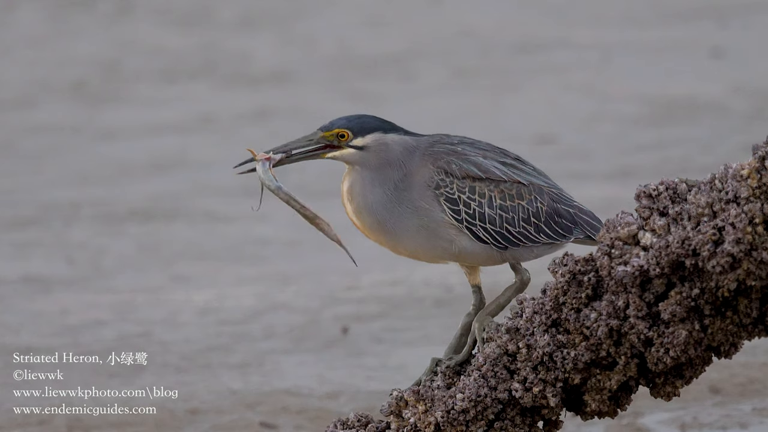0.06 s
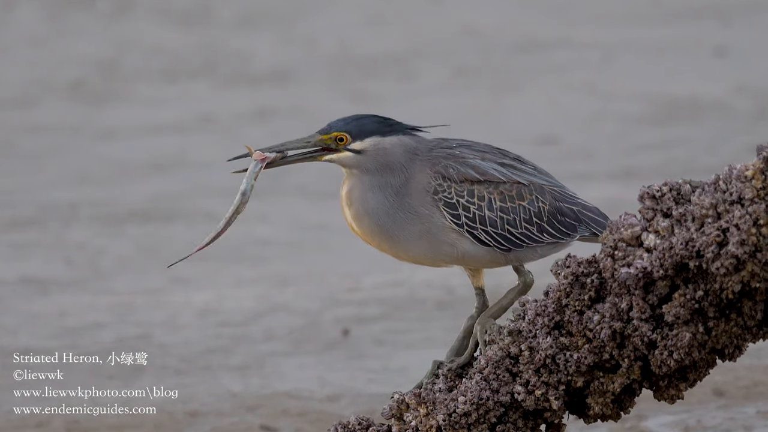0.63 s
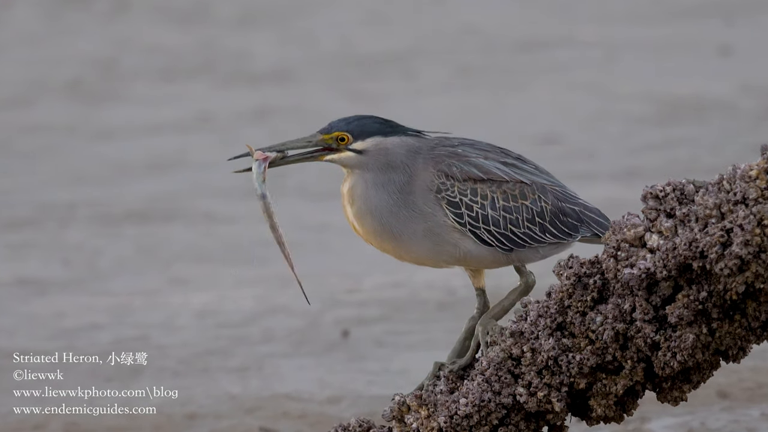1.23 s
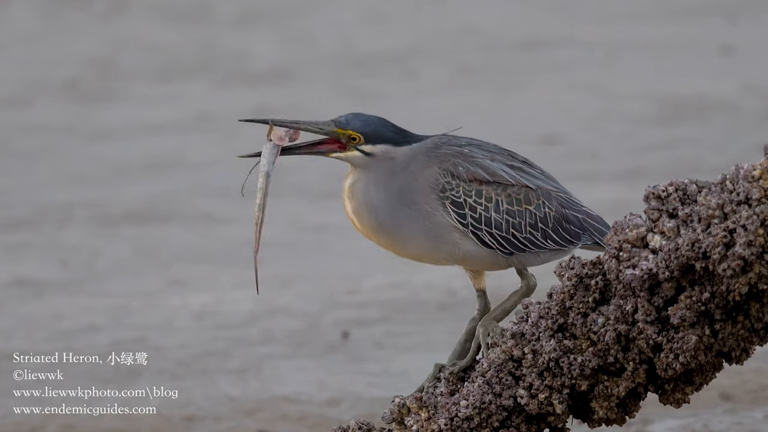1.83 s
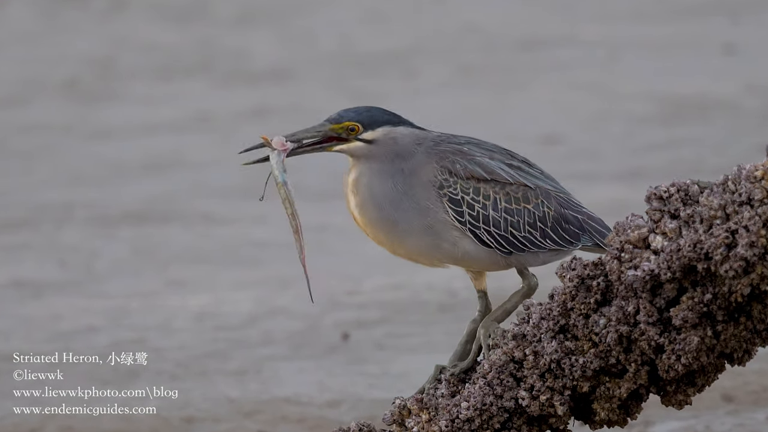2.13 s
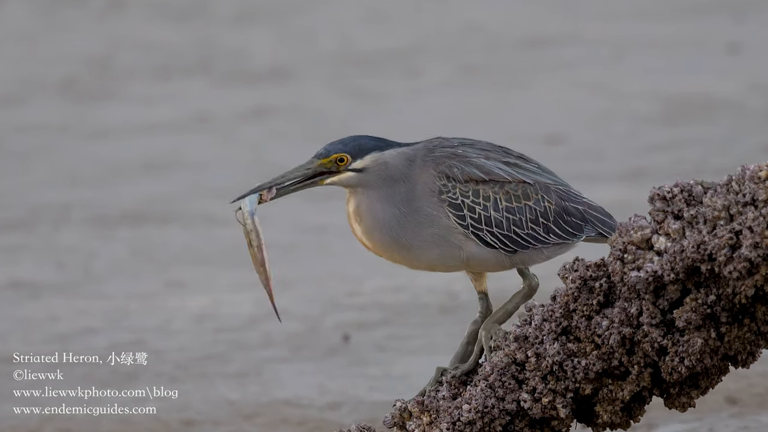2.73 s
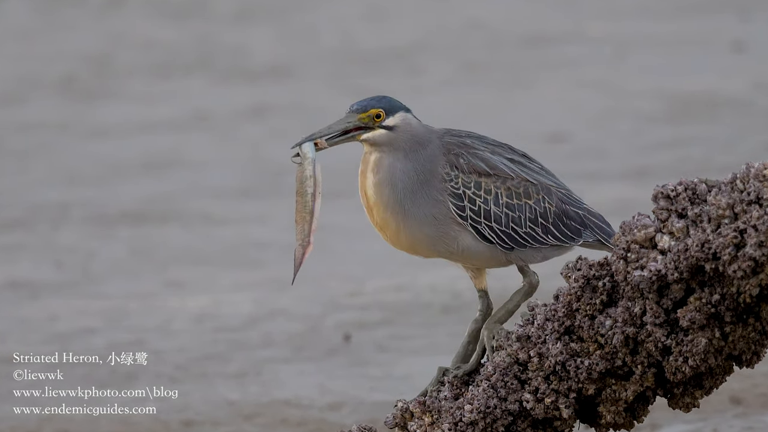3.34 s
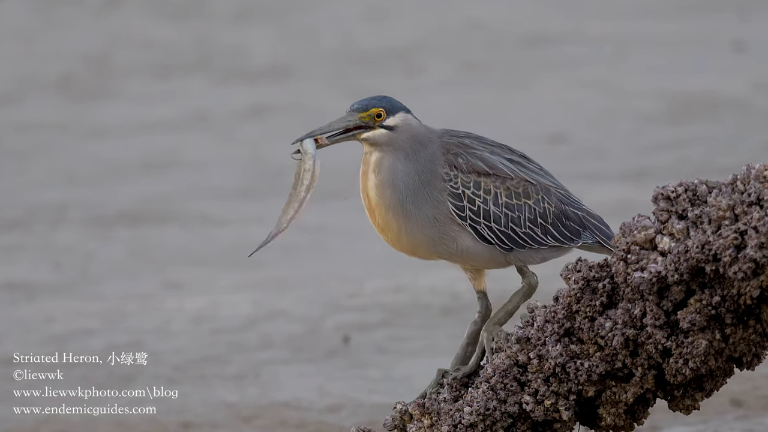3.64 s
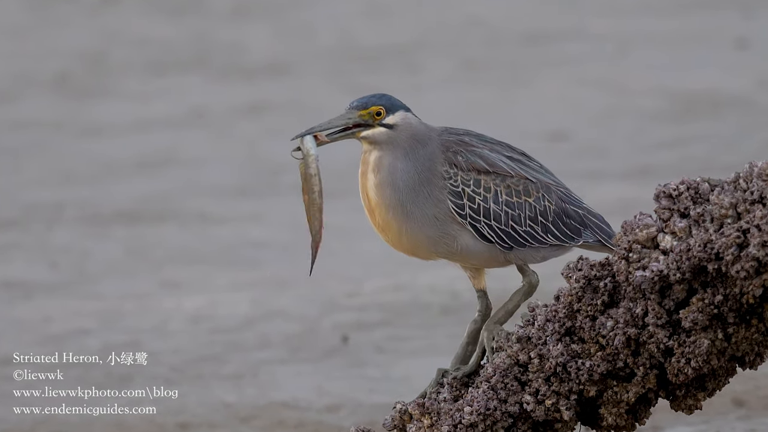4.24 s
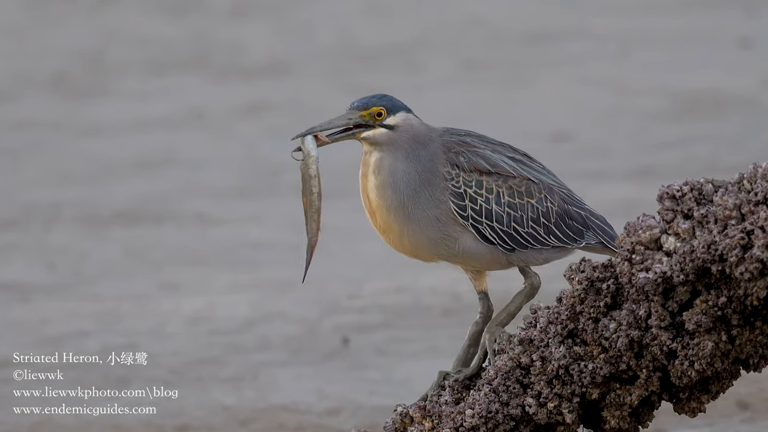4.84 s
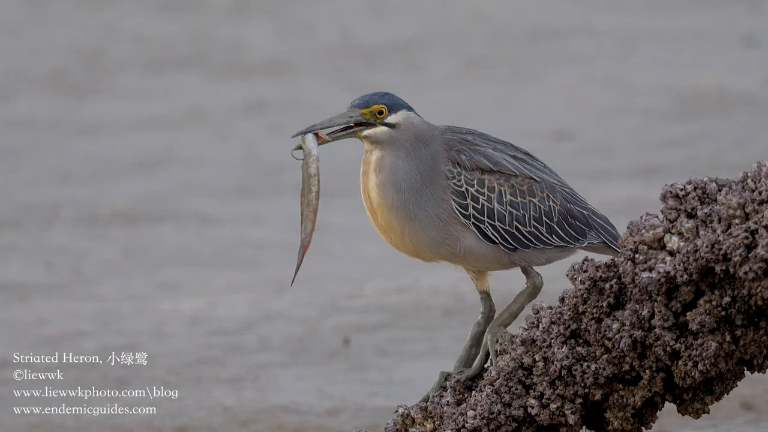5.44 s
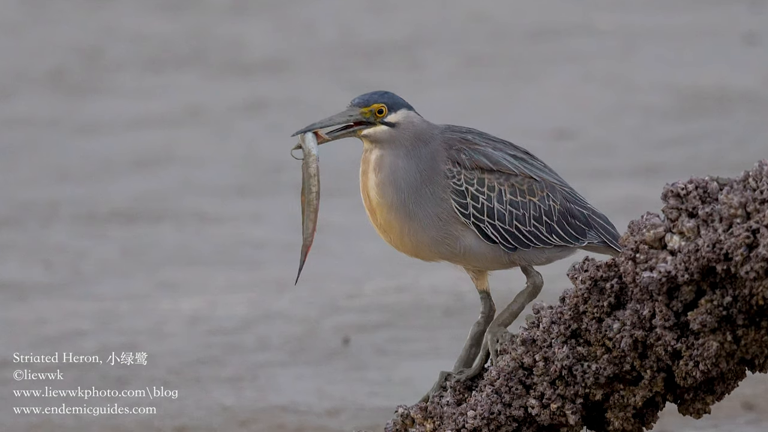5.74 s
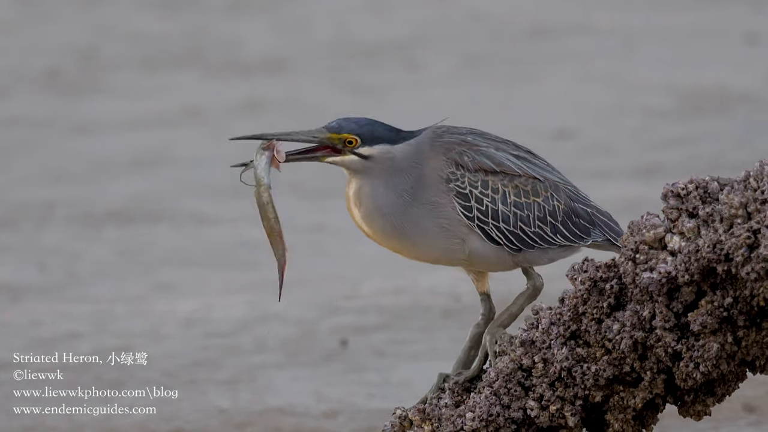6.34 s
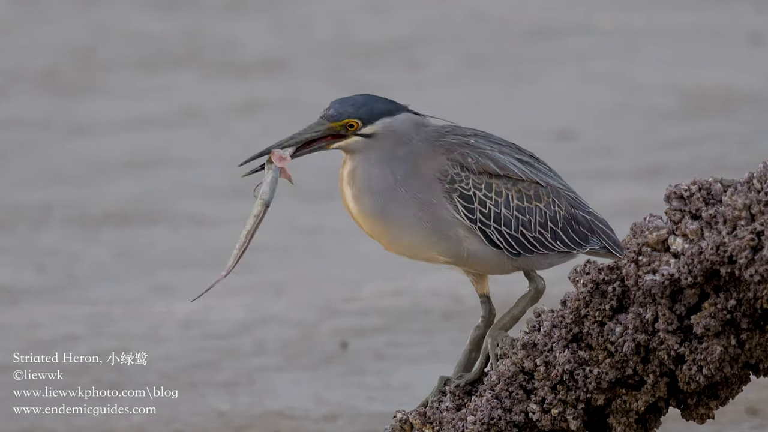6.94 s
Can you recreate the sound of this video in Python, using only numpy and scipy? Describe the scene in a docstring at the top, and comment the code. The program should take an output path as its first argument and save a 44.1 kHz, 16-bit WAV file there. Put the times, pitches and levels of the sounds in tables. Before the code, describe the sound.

Steady insect trilling and a small bird's short chirps over distant engine rumble, with two dry, buzzing rattles close by.

```python
"""Far engines rumble on a muddy shore, under a steady background hiss with a faint whirr near 900 Hz,
perhaps a lens motor. Insects trill in the trees, their tooth strikes exciting narrow resonances.
A small bird gives short arched chips and slurs, near-pure tones swept in frequency, among faint rustles
and ticks. Twice a dry rattle swells and dies away close by, in runs of about twenty short buzzes a
second: perhaps a lens motor stepping, each step a click and a buzz that set its housing rasping."""
import sys
import numpy as np
from scipy import signal
from scipy.fft import rfft, irfft
from scipy.io import wavfile
from scipy.ndimage import uniform_filter1d

SR = 44100
rng = np.random.default_rng(int(sys.argv[2]) if len(sys.argv) > 2 else 0)


def wrap_up_sound(samples):
    """Save the sound to the file named by the first command line argument, as 16-bit audio."""
    columns = np.atleast_2d(samples).T
    # keep every value between -1 and 1, then stretch to whole-number steps
    tamed = np.clip(columns, -1, 1)
    steps = np.round(tamed * 32767).astype(np.int16)
    wavfile.write(sys.argv[1], SR, steps)


N = 308259
T = np.arange(N) / SR
HZ = np.fft.rfftfreq(N, 1 / SR)


def amp(db):
    """Amplitude ratio: tenfold for every 20 dB."""
    return 10 ** (np.asarray(db) / 20)


def unit(x):
    """Normalisation to rms 1."""
    return x / np.sqrt(np.mean(x ** 2) + 1e-20)


def spectrum(points):
    """Interpolation over log frequency, at every bin."""
    hz, value = np.transpose(points)
    return np.interp(np.log(HZ + 1), np.log(hz), value)


def colour(x, gain):
    """Linear filtering: a gain for every bin."""
    return irfft(rfft(x) * gain, N)


def pan(db):
    """Interaural level difference: gains that put left db above right."""
    return amp(np.array([[.5], [-.5]]) * db)


def add(mix, start, sound):
    """Superposition of a sound from start [s] on."""
    part = mix[round(start * SR):][:len(sound)]
    part += sound[:len(part)]


def wander(hz):
    """Random modulation: noise of rms 1, low-passed near hz."""
    return unit(colour(rng.standard_normal(N), np.exp(-(HZ / hz) ** 2) * (HZ > 0)))


def noise(gain, correlation):
    """Partial coherence: two channels of coloured noise share a common part."""
    common, separate = rfft(rng.standard_normal((2, N)))
    correlation = np.clip(correlation, -1, 1)
    right = correlation * common + np.sqrt(1 - correlation ** 2) * separate
    return unit(irfft(np.array([common, right]) * gain, N))


def ringing(modes, correlation):
    """Resonance under random excitation: the modes add in power."""
    power = sum(amp(db) ** 2 / width / (1 + ((HZ - hz) / width * 1.09) ** 2) ** 2
                for hz, width, db in modes)
    return noise(np.sqrt(power), correlation)


# Spectrum of the roar: (frequency [Hz], relative level [dB])
ROAR_SPECTRUM = [(22, -40), (42, -42), (68, -15.5), (98, -13.5), (138, -5.5), (178, -1.5), (222, 1.5),
                 (246, -4.5), (285, -11), (410, -12), (505, -13.5), (625, -26.5), (1300, -40), (4000, -90)]
# Slow swell of the roar: (time [s], gain [dB])
ROAR_SWELL = [(0, -1.5), (1.4, 1), (2.3, -1.4), (2.85, 1.5), (3.6, -0.2), (4.3, 1), (5.1, -0.5), (6.3, 0),
              (6.7, -3), (7, 2)]
# Engine tones: (frequency [Hz], rms level [dB])
ENGINE_TONES = [(74.5, -75), (169, -65), (222, -68), (331, -73)]


def engines():
    """Line spectrum over a continuous one: wavering tones in the low roar of far engines."""
    swell = amp(np.interp(T, *np.transpose(ROAR_SWELL)))
    correlation = spectrum([(32, 0.66), (75, 0.99), (190, .9995), (610, 0.97)])
    roar = amp(-50.5) * swell * noise(amp(spectrum(ROAR_SPECTRUM)), correlation)
    tones = np.zeros(N)
    for hz, db in ENGINE_TONES:
        peak = np.sqrt(2) * amp(db + 2 * wander(hz=2.4))
        pitch = hz * (1 + 0.00956 * wander(hz=4.6))
        tones += peak * np.sin(2 * np.pi * np.cumsum(pitch) / SR)
    return roar + tones


# Spectrum of the background hiss and whirr: (frequency [Hz], relative level [dB])
BACKGROUND_SPECTRUM = [(30, -25), (310, -3.5), (660, -0.5), (800, 0.5), (885, 5.5), (975, -3), (1115, -2),
                       (1310, -6.5), (1660, -9.5), (2000, -5.5), (2620, -11), (3150, -9), (4100, -15.5),
                       (6000, -14.5), (9000, -14.5), (15500, -16.5)]
# Its balance: (frequency [Hz], left minus right [dB])
BACKGROUND_BALANCE = [(400, -0.5), (850, -1), (1200, -1.5), (2000, 1), (4000, 0), (9000, 3.5),
                      (13000, -0.5)]
# Its likeness at the two ears: (frequency [Hz], correlation [-1 to 1])
BACKGROUND_CORRELATION = [(100, 0.94), (700, 0.88), (1200, 0.56), (2500, 0.41), (5500, 0.36), (9000, -0.49),
                          (15000, 0.03)]


def hiss_and_whirr():
    """Resonance peaks in broadband noise: steady hiss, a faint whirr near 900 Hz, perhaps a lens motor."""
    gain = amp(spectrum(BACKGROUND_SPECTRUM)) * pan(spectrum(BACKGROUND_BALANCE))
    return amp(-56.5) * noise(gain, spectrum(BACKGROUND_CORRELATION))


# Resonances of three lone insects and a chorus: (frequency [Hz], bandwidth [Hz], relative level [dB])
TRILLER_MODES = [(6705, 22, 0.5), (6835, 34, -.5), (7080, 58, 0)]
NEAR_BUZZER_MODES = [(11560, 150, 0), (11070, 440, 1.5), (9600, 380, -10.5)]
FAINT_BUZZER_MODES = [(11240, 98, -0.49), (10800, 1100, -1.5)]
CHORUS_MODES = [(7615, 340, 8), (7230, 390, 0.5), (7010, 380, -8), (8360, 580, -3.5), (9640, 280, -6)]


def insects():
    """Stridulation: tooth strikes excite resonances, pulsed in three singers, blurred in the chorus."""
    singers = trill(TRILLER_MODES, rate_hz=41.0, sharpness=0.42, level_db=-68.5, pan_db=2)
    singers += trill(NEAR_BUZZER_MODES, rate_hz=130.3, sharpness=0.85, level_db=-72, pan_db=11.5)
    singers += trill(FAINT_BUZZER_MODES, rate_hz=160, sharpness=0.58, level_db=-70.5, pan_db=-0.5)
    chorus = ringing(CHORUS_MODES, correlation=0.4) * amp(wander(hz=14))
    return singers + amp(-62.5) * pan(5.2) * chorus


def trill(modes, rate_hz, sharpness, level_db, pan_db):
    """Amplitude modulation: an insect's resonances pulse without pause."""
    cycles = np.cumsum(rate_hz * (1 + 0.0013 * wander(hz=1.6))) / SR
    pulses = np.exp(sharpness * np.cos(2 * np.pi * cycles))
    return amp(level_db) * pan(pan_db) * unit(ringing(modes, correlation=0.052) * pulses)


# Resonances of a cricket's wings: (frequency [Hz], bandwidth [Hz], relative level [dB])
WING_MODES = [(7460, 45, -5.5), (7650, 31, 1), (7735, 39, 1), (7630, 220, -2)]


def cricket(period_s=.2224):
    """Gated resonance: two wing strokes a chirp, each a quick run of pulses."""
    lags = [(T - centre + period_s / 2) % period_s - period_s / 2 for centre in (.013, .065)]
    strokes = sum(np.exp(-(lag / .017) ** 4) for lag in lags)
    pulse_hz = 200 + 35 * wander(hz=24.5)
    pulses = 1 + .5 * np.cos(2 * np.pi * np.cumsum(pulse_hz) / SR)
    song = ringing(WING_MODES, correlation=0.11)
    song /= np.sqrt(uniform_filter1d((song ** 2).mean(0), size=1000) + 1e-9)  # evens out the strokes
    chirps = unit(song * strokes * pulses * amp(1.2 * wander(hz=2.8)))
    others = ringing(WING_MODES[:3], correlation=0.31)  # more of its kind blur together
    return pan(4.9) * (amp(-65) * chirps + amp(-68) * others)


# Arched chips: (time of the top [s], duration [s], top frequency [Hz], level [dB])
BIRD_CHIPS = [(0.082, .055, 3240, -55.5), (0.144, .043, 3140, -60.5), (.375, .04, 3540, -58.5),
              (0.616, 0.028, 2930, -58), (.674, .032, 2900, -60), (1.202, 0.047, 3780, -61),
              (1.369, .043, 3590, -47), (1.660, .034, 3640, -62), (1.729, .03, 3620, -61.5),
              (1.795, 0.045, 3320, -45.5), (1.928, .034, 3490, -43), (2.291, 0.046, 3410, -44),
              (2.348, .039, 3280, -46.5), (2.705, .04, 3780, -62), (2.794, 0.031, 3430, -42.5),
              (2.868, 0.031, 3190, -44.5), (3.468, .047, 3310, -45.5), (3.721, 0.042, 3285, -42.5),
              (4.017, 0.048, 3060, -60), (4.173, 0.038, 3540, -40), (4.249, 0.041, 3240, -45),
              (4.914, .04, 3300, -51), (5.289, 0.044, 3360, -49), (5.354, 0.04, 3384, -47),
              (6.147, 0.041, 3530, -54)]
# Slurred notes: (start [s], duration [s], start frequency [Hz], end frequency [Hz], level [dB])
BIRD_SLURS = [(3.911, 0.051, 2870, 3270, -52), (4.657, .045, 2920, 3200, -58.5),
              (6.286, 0.036, 3350, 3170, -48), (6.329, 0.027, 3550, 2960, -51),
              (6.374, 0.034, 3180, 2740, -55)]
CHIP_FOOT_HZ, CHIP_MIN_SWEEP_HZ = 2746, 200  # a loud chip climbs from the foot and returns to it
CHIP_RISE_SHARE = .55  # of its duration


def bird():
    """Frequency modulation: chips arch up and down, loudest at the top; slurs glide one way."""
    song = np.zeros(N)
    for top_s, length, top_hz, db in BIRD_CHIPS:
        progress = np.linspace(0, 1, round(length * SR))
        from_top = np.interp(progress, [0, CHIP_RISE_SHARE, 1], [1, 0, 1])
        drop = np.sin(from_top ** 1.28 * np.pi / 2) ** 2
        effort = min(1.5 + (db + 51) / 17, 1)  # the softest chips sweep less
        sweep_hz = max(effort * (top_hz - CHIP_FOOT_HZ), CHIP_MIN_SWEEP_HZ)
        envelope = amp(db) * (1 - from_top ** 2) ** 1.63
        add(song, top_s - CHIP_RISE_SHARE * length, whistle(top_hz - sweep_hz * drop, envelope))
    for start, length, from_hz, to_hz, db in BIRD_SLURS:
        progress = np.linspace(0, 1, round(length * SR))
        lowness = progress if to_hz < from_hz else 1 - progress
        envelope = amp(db) * abs(np.sin(np.pi * lowness ** 0.69))  # loudest toward the high end
        add(song, start, whistle(from_hz + (to_hz - from_hz) * progress, envelope))
    return pan(3) * song + amp(-10) * echoes(song, t60=0.13)


def whistle(hz, envelope):
    """Jitter and shimmer: a tone with a weak second harmonic quivers in pitch and strength."""
    jitter, shimmer = (unit(uniform_filter1d(rng.standard_normal(len(hz)), size=n)) for n in (130, 220))
    phase = 2 * np.pi * np.cumsum(hz + 22 * jitter) / SR
    return envelope * amp(1.06 * shimmer) * (np.sin(phase) + amp(-25.5) * np.sin(2 * phase))


def echoes(x, t60):
    """Reverberation: scattered reflections, different for each ear, fall 60 dB in t60 [s]."""
    t = T[:SR // 2]
    taps = rng.standard_normal((2, len(t))) * (rng.random((2, len(t))) < .1) * amp(-60 * t / t60)
    return signal.fftconvolve(x[None], taps / np.linalg.norm(taps[0]), axes=1)[:, :N]


# Faint high rustles: (start [s], duration [s], level [dB])
RUSTLE_EVENTS = [(0.717, .13, -64), (0.758, .24, -61), (1.194, .23, -62.5)]
# Their spectrum: (frequency [Hz], relative level [dB])
RUSTLE_SPECTRUM = [(1500, -10), (3000, 0.5), (4500, -7), (5700, 2.5), (6800, -5), (12000, -16)]


def rustles():
    """Random amplitude modulation makes brief swells of hiss crackle."""
    swell = np.zeros(N)
    for start, length, db in RUSTLE_EVENTS:
        add(swell, start, amp(db) * signal.windows.hann(round(length * SR)))
    return noise(amp(spectrum(RUSTLE_SPECTRUM)), correlation=0.42) * swell * amp(2 * wander(hz=120))


# Small ticks: (time [s], level [dB], frequency [Hz])
TICK_EVENTS = [(2.034, -55, 4700), (2.409, -62, 3500), (2.655, -61, 4200), (2.986, -57, 5000),
               (3.874, -49, 1430), (6.705, -49, 1750)]


def ticks():
    """Exponential decay: narrow-band noise that dies in milliseconds is heard as a tick."""
    mix = np.zeros(N)
    t = T[:SR // 40]
    for time, db, hz in TICK_EVENTS:
        band = signal.butter(1, [hz * 0.98, hz * 1.1], "band", fs=SR)
        ring = unit(signal.lfilter(*band, rng.standard_normal(len(t))))
        add(mix, time - .001, amp(db) * ring * np.exp(-t / 0.004))
    return mix


# Runs of rattle steps: (first [s], last [s], steps [count], click gain [dB], lowest partial gain [dB])
STEP_RUNS = [(4.066, 4.114, 2, 0, -10), (4.145, 4.192, 2, 1, -10), (4.254, 4.362, 3, 1, -9.5),
             (4.409, 4.509, 3, 2.5, -9), (4.57, 4.701, 3, 0, -9), (5.664, 5.806, 4, -4, -7),
             (5.854, 6.097, 6, -6.5, -3), (6.145, 6.243, 3, 1, -2.5), (6.294, 6.407, 3, -9, -5.5),
             (6.469, 6.625, 4, -8, -2.5)]
# Swell and fall of the two rattles: (time [s], drive level [dB])
STEP_LEVEL = [(4.06, -56.5), (4.11, -48), (4.46, -47), (4.51, -55.5), (4.57, -59), (4.7, -53),
              (5.66, -53.5), (5.76, -46), (6.0, -44.5), (6.28, -46), (6.4, -48.5), (6.52, -49), (6.63, -60)]


def steps():
    """Periodic excitation: evenly spaced steps, no two quite alike in level."""
    for first, last, count, click_gain_db, bass_gain_db in STEP_RUNS:
        for start in np.linspace(first, last, round(count)):
            drive_db = np.interp(start, *np.transpose(STEP_LEVEL)) + .6 * rng.standard_normal()
            click_db = drive_db + click_gain_db + 0.3 * rng.standard_normal()
            yield start, drive_db, click_db, drive_db + bass_gain_db


# Partials of the buzz:
# (frequency [Hz], relative level [dB], rms waver [Hz], share of drift [ratio], change over a step [dB])
BUZZ_PARTIALS = [(508, 4.5, 9.6, .1, 2.5), (834, 0, 25, .5, -10.5), (1075, -0.5, 33.5, 0.94, -3),
                 (1448, -5, 30, 0.003, 0.5)]
# Slow drift of pitch: (time [s], relative rise [ratio])
BUZZ_DRIFT = [(4.1, 0.032), (4.7, 0.067), (5.7, -0.047), (5.9, -0.0059), (6.24, .01), (6.32, .11),
              (6.7, 0.12)]


def buzz(drive, bass, glide, step_progress):
    """Inharmonic partials glide together; the lowest has an envelope of its own."""
    drift = np.interp(T, *np.transpose(BUZZ_DRIFT))
    partials = []
    for hz, db, waver_hz, share, change_db in BUZZ_PARTIALS:
        pitch = hz * (1 + glide + share * drift) + waver_hz * wander(hz=109)
        strength = amp(db + change_db * step_progress + 1.7 * wander(hz=40))
        partials.append(strength * np.sin(2 * np.pi * np.cumsum(pitch) / SR))
    return bass * partials[0] + drive * sum(partials[1:])


# Response of the rattling housing: (frequency [Hz], relative level [dB])
HOUSING_RESPONSE = [(150, -35), (520, -10), (650, -7), (820, 7.5), (960, -18), (1130, 4.5), (1300, -7),
                    (1500, -4), (1800, -9), (2900, -13.5), (4000, -7), (4750, -13.5), (5900, -18),
                    (10000, -27)]
# Balance of the rattle: (frequency [Hz], left minus right [dB])
RATTLE_BALANCE = [(380, -2), (700, -5), (1290, -11), (2400, -5), (4400, 0)]
STEP_S, CHATTER_S, CHATTER_COUNT = .031, 0.07, 5


def rattle():
    """Impact and forced vibration: each step clicks, then buzzes and rasps in the housing."""
    drive, bass, clicks, glide, step_progress = np.zeros((5, N))
    t = T[:round(STEP_S * SR)]
    progress = t / STEP_S
    gate = np.clip(5 * (1 - progress), 0, 1)  # starts at once, stops quickly
    climb = np.sin(2.1 * progress) - .72  # the pitch climbs and sags
    for start, drive_db, click_db, bass_db in steps():
        reach, knock_s = rng.uniform(0.072, 0.15), rng.uniform(.003, 0.017)
        add(step_progress, start, progress)
        add(drive, start, amp(drive_db) * gate)
        add(bass, start, amp(bass_db) * np.sin(np.pi * progress))
        add(glide, start, reach * climb)
        add(clicks, start, amp(click_db) * np.exp(-t / 0.0025))
        add(clicks, start + knock_s, amp(click_db) * np.exp(-t / 0.0012) / 2)  # the parts knock again
        for wait, size in rng.random((CHATTER_COUNT, 2)):  # loose parts chatter on
            add(clicks, start + wait * CHATTER_S, size * amp(click_db - 4) * np.exp(-t / 0.0013))
    tone = amp(-5) * buzz(drive, bass, glide, step_progress)
    correlation = spectrum([(600, 0.92), (1400, 1.0), (5000, 0.23)])
    grit = noise(amp(spectrum(HOUSING_RESPONSE)), correlation)
    rasp = grit * (amp(-9.5) * drive * amp(2 * wander(hz=400)) + amp(-5.5) * clicks)
    ping = amp(-4) * clicks * ringing([(4000, 400, 0)], correlation=0.84)  # a small hard part rings
    return colour(tone + rasp + ping, pan(spectrum(RATTLE_BALANCE)))


def scene():
    """Superposition: the pressures of all sources add."""
    return engines() + hiss_and_whirr() + insects() + cricket() + bird() + rustles() + ticks() + rattle()


def record(dry):
    """Band limiting: a linear-phase low-pass removes the highest treble."""
    lowpass = signal.firwin(511, cutoff=15750, window=("kaiser", 9), fs=SR)
    return signal.oaconvolve(dry, lowpass[None], "same")


dry = scene()
out = record(dry)
wrap_up_sound(out)
```